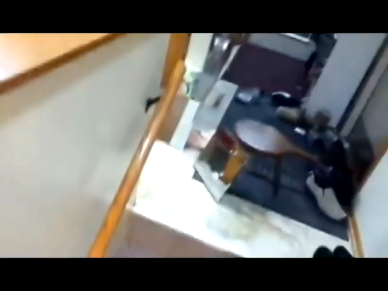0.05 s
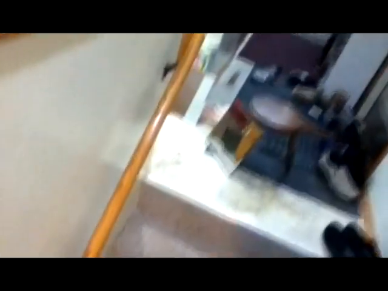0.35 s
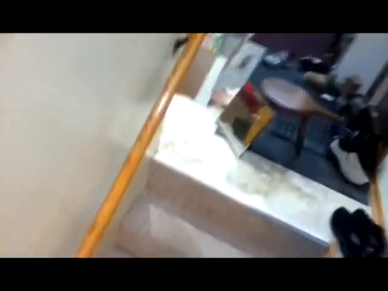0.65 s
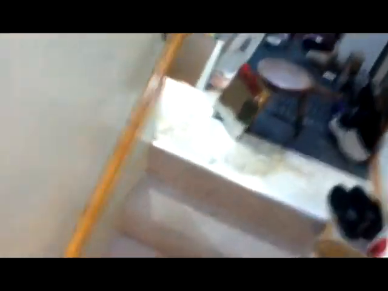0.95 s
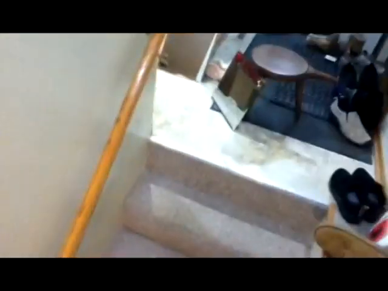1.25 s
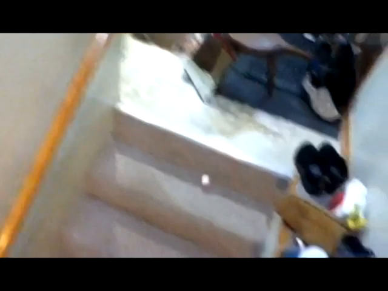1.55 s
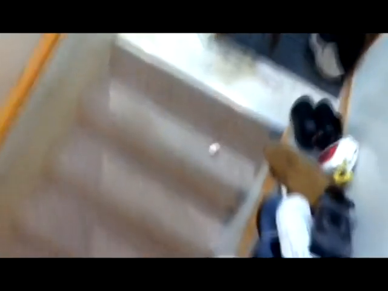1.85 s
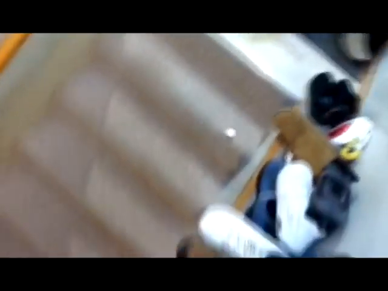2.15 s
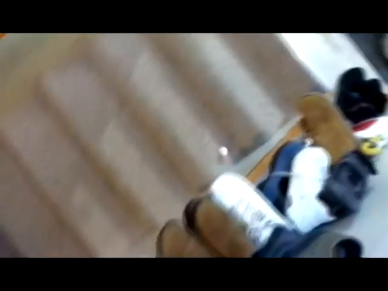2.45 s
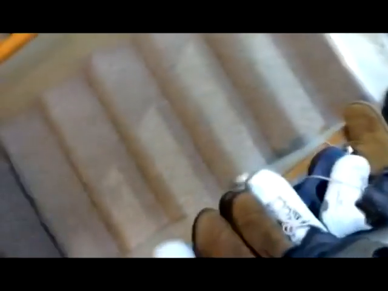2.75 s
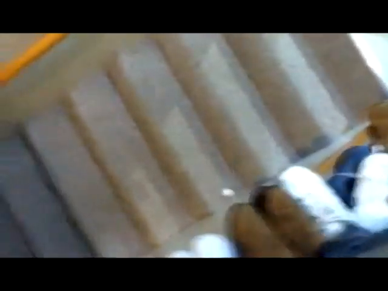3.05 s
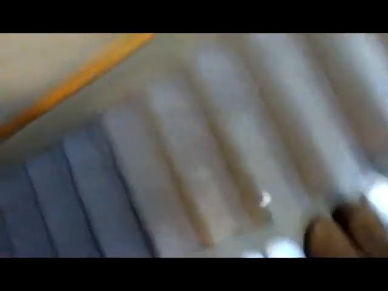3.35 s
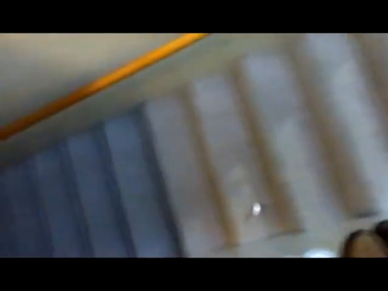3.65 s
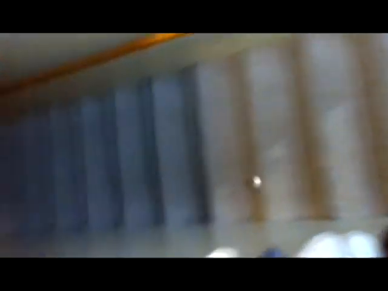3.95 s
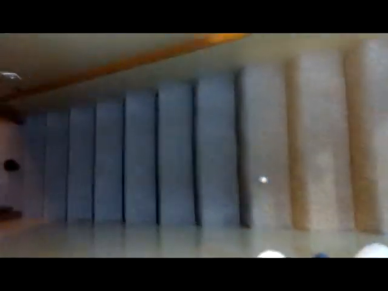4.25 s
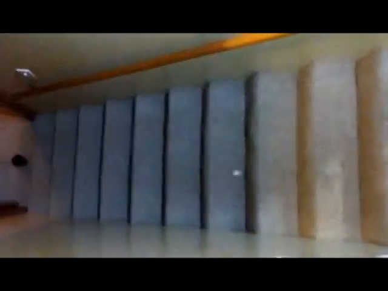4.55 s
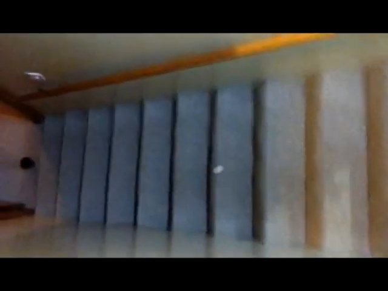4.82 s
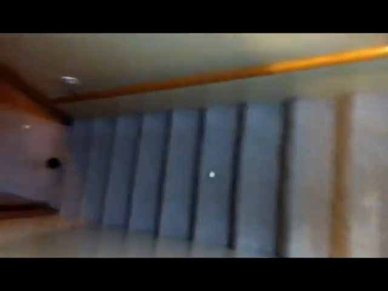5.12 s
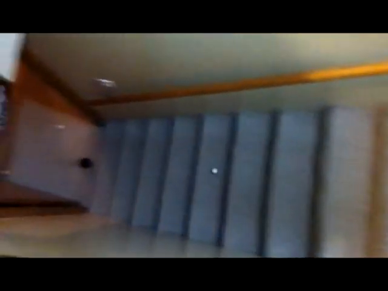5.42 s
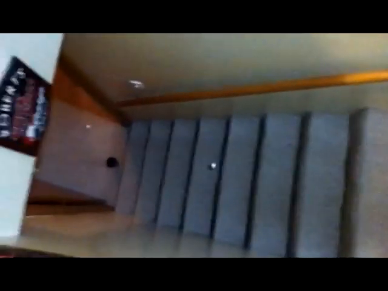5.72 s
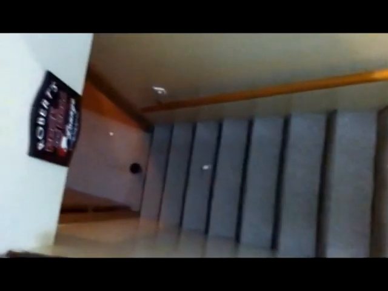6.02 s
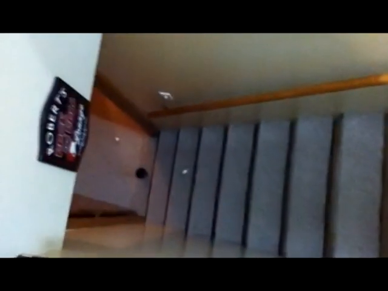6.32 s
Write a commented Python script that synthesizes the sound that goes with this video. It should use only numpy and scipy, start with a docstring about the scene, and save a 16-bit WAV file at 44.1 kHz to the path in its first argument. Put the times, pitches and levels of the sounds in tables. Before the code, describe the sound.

In a house stairwell, sharp, hollow clicks speed up as a light ball bounces on a hard surface. The sound changes to soft thuds as it hops down carpeted steps and moves away, most landings trailed by a tiny second touch. Someone following it makes a few close footfalls, shoe scuffs and clothing swishes, with one deep microphone bump midway, over quiet room noise.

```python
"""A light hollow ball clicks on a hard ledge, bouncing ever faster, then drops down carpeted stairs.
Each click is a knock from the ledge plus a high ring from the ball's thin shell. Each stair gives a
dull tap and a small second touch, with more echo as the ball gets farther away. Close by, a person
following it scuffs their soles, steps, swishes their clothes and once bumps the microphone.
The house murmurs underneath, and the loudest hits overload the microphone."""
import sys
import numpy as np
from scipy import signal
from scipy.fft import rfft, irfft, next_fast_len
from scipy.io import wavfile
from scipy.ndimage import uniform_filter1d

SR = 44100
rng = np.random.default_rng(int(sys.argv[2]) if len(sys.argv) > 2 else 0)


def log_audio(samples):
    """Write samples as a 16-bit WAV file to the path given in sys.argv[1]."""
    # one column per channel
    frames = np.atleast_2d(samples).T
    # limit to full scale, then quantise
    limited = np.clip(frames, -1, 1)
    pcm = np.round(limited * 32767).astype(np.int16)
    wavfile.write(sys.argv[1], SR, pcm)


N = 285768
SIZE = 16384  # samples in one short sound
HZ = np.fft.rfftfreq(SIZE, 1 / SR)
T = np.arange(SIZE) / SR

# The ledge's tones, for hits at spots 0, 0.5 and 1 on the ball:
# pitch_hz, half_width_hz, spot_0_db, spot_half_db, spot_1_db
LEDGE_TONES = [(272, 270, 1, -5.5, -2), (520, 120, -5, -9.5, -10), (1050, 300, -4, -4.5, -1.5),
               (1580, 215, -3, -5, -21), (2055, 560, -23, -3, 2.5), (2920, 140, -9.5, -30, -7),
               (3320, 240, -6.5, -13, -14), (4580, 390, -14, -8.5, -13), (5350, 280, -29, -19, -12.5),
               (6700, 390, -20.5, -11.5, -43)]
# The shell's tones: pitch_hz, half_width_hz, spot_0_db, spot_half_db, spot_1_db
SHELL_TONES = [(7670, 190, -13, -10, 3), (8070, 125, -7, 1, 11), (8650, 170, -17, -16, -36),
               (9390, 135, 4, -13, -26), (9640, 75, -8, -7, 2), (9970, 110, -24, 4, 10),
               (10470, 130, 1, -11, -14), (10990, 90, 1, -8, -30), (11230, 125, -2, 1, -30),
               (11970, 125, 1, -3, 3), (12560, 140, -5, -18, -6), (12950, 170, -13, -16, -37),
               (13600, 210, -10, -17, -18), (14800, 400, -15, -18, -31)]
# Hits on the ledge, the last on the side of the stairs:
# start_s, level_db, spot (0 to 1), shell_db, pock_hz, pock_db
HARD_HITS = [(-.008, -4.5, 1, 2, 2420, -8), (0.1825, -9.5, 0, -1.5, 1500, -11),
             (0.3803, -10.5, 0.09, -1, 1810, -16), (.554, -12.5, 0.07, -1, 900, -2),
             (.713, -7, 0.56, 1, 1270, -13), (.8333, -6, 0.8, 1, 2780, -3.5),
             (0.9395, -15.5, 0.3, .5, 1100, -5), (1.0378, -11, 0.51, 2.5, 2400, -3),
             (1.1293, -13.5, .14, 3.5, 3460, -11), (1.211, -19.5, 0.36, 4, 1400, -28),
             (1.292, -12, .55, 3, 1550, 7), (1.3513, -16.5, 0.22, -2, 1350, 4.5),
             (2.833, -22, .1, -3, 646, 11)]
def ledge_clicks(pock_width_hz=300, contrast=1.04, treble_db_per_octave=2):
    """Hard, brief hits knock the ledge, with a hollow pock, and make the ball's shell ring."""
    track = np.zeros(N)
    for start_s, level_db, spot, shell_db, pock_hz, pock_db in HARD_HITS:
        knock = struck_tones(LEDGE_TONES, spot) + amp(pock_db) * resonance(pock_hz, pock_width_hz)
        shell = struck_tones(SHELL_TONES, spot) ** contrast  # deepens the gaps between tones
        octaves_up = np.log2((HZ + 1) / SHELL_TONES[0][0])
        shell *= amp(shell_db + treble_db_per_octave * octaves_up)  # a thin shell favours high tones
        gain = (knock + shell) * bass_loss(hz=165)
        path = stairwell_echo(walls_db=6, walls_s=.0048, room_db=-3.5, count=24)
        add(track, start_s, amp(level_db) * impact(gain, path))
    return track


# How long the echo takes to fade by 60 dB: pitch_hz, fade_s
ECHO_FADES = [(100, 0.68), (260, 0.35), (700, 0.27), (1800, 0.3), (5000, 0.31), (9000, 0.23), (14000, 0.14)]
def stairwell_echo(walls_db, walls_s, room_db, count=14):
    """Sound reaches the microphone directly, off the near walls, and as a fading wash of echoes."""
    path = np.zeros(SIZE)
    delay = (np.arange(count) + 1 + rng.random(count)) / count
    echoes = rng.choice([-1, 1], count) * np.exp(-delay / 2)
    np.add.at(path, (delay * walls_s * SR).astype(int), amp(walls_db) * echoes / np.linalg.norm(echoes))
    path[0] += 1  # the direct sound
    hz, t, noise = signal.stft(rng.standard_normal(SIZE), SR, nperseg=256)
    fade = amp(-60 * t / read_curve(ECHO_FADES, hz)[:, None])
    tail = signal.istft(noise * fade, nperseg=256)[1][:SIZE]
    tail *= 1 - np.exp(-(T / 0.0014) ** 2)
    return path / np.linalg.norm(path) + amp(room_db) * tail / np.linalg.norm(tail)


# The background's mix of low and high: pitch_hz, relative_db
AIR_COLOUR = [(15, -50), (30, -15), (55, -7.5), (90, -8), (130, 0.5), (200, -2), (270, 0.5), (400, -7),
              (750, -13.5), (1300, -18), (3800, -21), (9000, -24), (13000, -29), (15800, -33)]
# Its loudness over time: time_s, level_db
AIR_LEVELS = [(0.0, -38.5), (2.4, -40), (3.0, -33.5), (4.4, -39.5), (6.48, -41.5)]
def room_tone():
    """Air murmurs low in the house while the microphone hisses."""
    air = filtered(rng.standard_normal(N), lambda hz: amp(read_curve(AIR_COLOUR, hz)))
    level_db = np.interp(np.arange(N) / SR, *np.transpose(AIR_LEVELS))
    return air / rms(air) * amp(level_db)


# Soles rubbing the floor: peak_s, level_db, fade_s, pitch_hz, width_octaves
SOLE_RUBS = [(.629, -27.5, 0.11, 2800, .8), (2.332, -17, 0.03, 8000, 1.5), (3.248, -12.5, 0.04, 2420, .7),
             (3.363, -16, 0.0047, 2220, 1.7), (3.45, -32, .07, 2900, 1.3)]
def sole_scuffs(rise_s=.0007):
    """A sole catches almost at once, then its rubbing dies away."""
    return friction([(s, db, rise_s, fade_s, hz, octaves) for s, db, fade_s, hz, octaves in SOLE_RUBS])


# The floor's deep tones, used for every thump: pitch_hz, relative_db, fade_s
FLOOR_TONES = [(64.6, -6, 0.18), (94, 1.5, 0.092), (143.4, 2.5, 0.2), (191.5, -8.5, 0.22),
               (256, -3.5, 0.16)]
# Footfalls, and one deep bump from handling the microphone (at 2.878 s): start_s, level_db, pitch_hz
THUMPS = [(.632, -19.5, 191), (0.668, -31.5, 170), (2.302, -23, 136), (2.342, -24.5, 169),
          (2.878, -10.5, 72), (3.449, -32, 226)]
def low_thumps(rise_s=0.0021, spread_octaves=0.54, bass_cut_hz=50):
    """Footfalls and a bump on the microphone: each is a few fading tones, favouring those near its pitch."""
    track = np.zeros(N)
    for start_s, level_db, pitch_hz in THUMPS:
        boom = np.zeros(SIZE)
        for hz, db, fade_s in FLOOR_TONES:
            strength = hump(hz, pitch_hz, spread_octaves) * amp(db - 60 * T / fade_s)
            boom += strength * np.sin(2 * np.pi * hz * T)
        boom *= 1 - np.exp(-T / rise_s)
        add(track, start_s, -amp(level_db) * boom / rms(boom[:SR // 50]))
    return signal.sosfilt(signal.butter(2, bass_cut_hz, "high", fs=SR, output="sos"), track)


# Cloth rubbing: peak_s, level_db, rise_s, pitch_hz
CLOTH_RUBS = [(.681, -32.5, .01, 2500), (2.347, -23.5, 0.021, 3220), (2.415, -28.5, 0.063, 1400),
              (2.776, -36, 0.015, 3660), (2.886, -30.5, 0.012, 3530), (3.065, -37.5, 0.014, 4800),
              (3.179, -20, 0.019, 2880), (3.396, -31.5, 0.022, 2770)]
def clothes_swishes(fade_per_rise=5.5, octaves=1.21):
    """The hiss of cloth swells and dies at the pace of the movement."""
    return friction([(s, db, rise_s, fade_per_rise * rise_s, hz, octaves)
                     for s, db, rise_s, hz in CLOTH_RUBS])


# How a carpeted stair answers a hit: pitch_hz, relative_db
CARPET_COLOUR = [(30, -53), (60, -33), (120, -5), (220, -1.5), (330, 4.5), (600, 2.5), (1000, 1.5),
                 (2000, -1.5), (3500, -5.5), (5500, -12), (15000, -35)]
# From ball to microphone: time_s, distance_m
BALL_DISTANCES = [(1.5, 1.14), (4.6, 1.38), (6.2, 2.64)]
# The ball landing on each stair: start_s, level_db, cutoff_hz, stair_hz, stair_db, boom_db, hop_s
STAIR_LANDINGS = [(1.5861, -8, 1230, 970, -2.5, 1, 0.17), (2.4481, -2.5, 1130, 525, 4.5, -0.5, 0.15),
                  (2.982, -6, 1100, 510, 4, 2, 0.15), (3.6342, -4.5, 970, 369, 11, -19, .188),
                  (4.144, -7.5, 1080, 940, -9, -12, .132), (4.6484, -9, 1200, 241, -1, -19, 0.15),
                  (5.093, -10, 1220, 540, -6.5, 4, .14), (5.4931, -11, 1270, 590, -8, -4, 0.12),
                  (5.864, -14.5, 1060, 510, 4.5, 8.5, 0.1), (6.216, -13, 1200, 274, 8.5, 0.5, .11)]
def stair_taps(sharpness=4.5, boom_hz=145, boom_width_hz=45, fibres_db=-25, shell_db=-25):
    """Carpet softens each hit: the stair thuds, the staircase booms, fibres tick, the shell barely rings."""
    track = np.zeros(N)
    for start_s, level_db, cutoff_hz, stair_hz, stair_db, boom_db, hop_s in STAIR_LANDINGS:
        ring = amp(stair_db) * resonance(stair_hz, stair_hz / sharpness)
        thud = amp(read_curve(CARPET_COLOUR, HZ)) * (1 + ring)
        boom = amp(boom_db) * resonance(boom_hz, boom_width_hz) * bass_loss(hz=60)
        distance_m = np.interp(start_s, *np.transpose(BALL_DISTANCES))
        room_db = -11 + 20 * np.log10(distance_m)  # farther away, more echo
        # The ball hops and touches the same stair again; higher hops land harder.
        second_db = -16.5 + 16.5 * np.log2(hop_s / .15)
        for delay_s, force_db in (0, 0), (hop_s, second_db):
            dull_hz = cutoff_hz * 2 ** (force_db / 16.5)  # a weaker touch lasts longer, so is duller
            contact = 1 / np.sqrt(1 + (HZ / dull_hz) ** 12) + amp(fibres_db)
            gain = contact * (thud + boom) + amp(shell_db) * struck_tones(SHELL_TONES, spot=0.34)
            path = stairwell_echo(walls_db=3, walls_s=.009, room_db=room_db)
            add(track, start_s + delay_s, amp(level_db + force_db) * impact(gain, path))
    return track


def friction(strokes, body_db=-5, body_hz=646, grain_db=2, broad_db=-36, dull_hz=13000):
    """Rubbing makes a grainy hiss, with a dull body under it, that swells and dies."""
    track = np.zeros(N)
    lead_s = SIZE // 4 / SR
    t = T - lead_s
    for peak_s, level_db, rise_s, fade_s, pitch_hz, octaves in strokes:
        fibres = uniform_filter1d(rng.standard_normal(SIZE), size=40)
        grains = rng.standard_normal(SIZE) * amp(grain_db * fibres / rms(fibres))
        hiss = filtered(grains, lambda hz: hump(hz, pitch_hz, octaves)
                        + amp(body_db) * hump(hz, body_hz, octaves=0.96) + amp(broad_db))
        swell = np.where(t < 0, np.exp(-(t / rise_s) ** 2), amp(-60 * np.abs(t) / fade_s))
        add(track, peak_s - lead_s, amp(level_db) * swell * hiss / rms(hiss))
    return filtered(track, lambda hz: 1 / np.sqrt(1 + (hz / dull_hz) ** 8))  # soft fibres lack top treble


def impact(gain, path):
    """One hit and its echoes, with an average level of 1 over the first 10 ms."""
    echoes = rfft(path)
    echo_colour = np.sqrt(np.abs(uniform_filter1d(np.abs(echoes) ** 2, size=80)) + 1e-9)
    colour = np.maximum(gain / echo_colour, 1e-6)  # the struck object sets the tone; echoes add ripple
    # Pack the sound as early as it can go (minimum phase).
    cepstrum = irfft(np.log(colour))
    cepstrum[1:SIZE // 2] *= 2
    cepstrum[SIZE // 2 + 1:] = 0
    sound = irfft(np.exp(rfft(cepstrum)) * echoes)
    return sound / rms(sound[:SR // 100])


def struck_tones(table, spot, scatter_db=1.23):
    """The spot that is hit decides how strongly each tone rings."""
    return sum(amp(np.interp(spot, [0, .5, 1], levels) + rng.normal(0, scatter_db)) * resonance(hz, width)
               for hz, width, *levels in table)


def resonance(hz, half_width_hz):
    """An object answers most strongly near its own pitch."""
    return 1 / (1 + ((HZ - hz) / half_width_hz) ** 2)


def bass_loss(hz):
    """A small object gives off little sound below this pitch."""
    return HZ ** 2 / (HZ ** 2 + hz ** 2)


def hump(hz, centre_hz, octaves):
    """A bell-shaped band of pitches."""
    return np.exp(-(np.log2((hz + 1) / centre_hz) / octaves) ** 2 / 2)


def amp(db):
    """Turn decibels into a multiplier."""
    return 10 ** (np.asarray(db) / 20)


def rms(x):
    """Average level (root mean square)."""
    return np.sqrt(np.mean(x ** 2) + 1e-20)


def read_curve(points, hz):
    """Read between (pitch_hz, value) points, with octaves evenly spaced."""
    pitches, values = np.transpose(points)
    return np.interp(np.log(hz + 1), np.log(pitches), values)


def add(track, start_s, sound):
    """Mix a sound into the track."""
    start = round(start_s * SR)
    part = sound[max(0, -start):N - start]
    track[max(0, start):][:len(part)] += part


def filtered(x, gain):
    """Turn each pitch up or down by gain(hz)."""
    size = next_fast_len(len(x) + 8192)
    return irfft(rfft(x, size) * gain(np.fft.rfftfreq(size, 1 / SR)), size)[:len(x)]


def scene():
    """Ball, person and room in one channel."""
    ball = ledge_clicks() + stair_taps()
    thumps = low_thumps()
    rubs = clothes_swishes() + sole_scuffs()
    close_path = stairwell_echo(walls_db=-14.5, walls_s=0.0041, room_db=-11)
    rubs = signal.fftconvolve(rubs, close_path)[:N]
    return (ball + thumps + rubs + room_tone())[None]


def record(dry, top_hz=15900):
    """The microphone flattens the loudest peaks, and the highest treble is cut off."""
    return filtered(np.clip(dry[0], -1, 1), lambda hz: hz < top_hz)[None]


dry = scene()
out = record(dry)
log_audio(out)
```